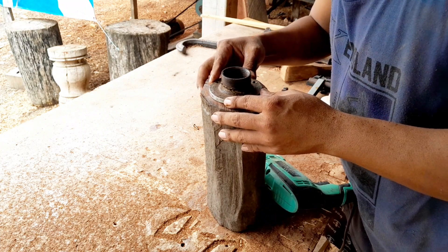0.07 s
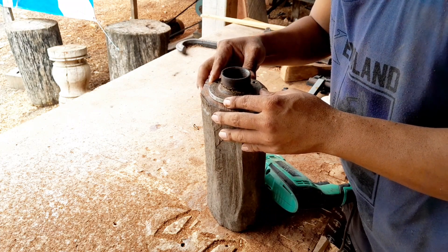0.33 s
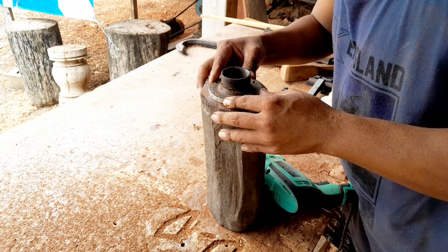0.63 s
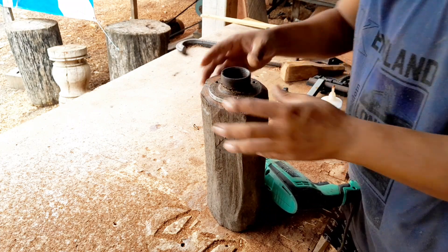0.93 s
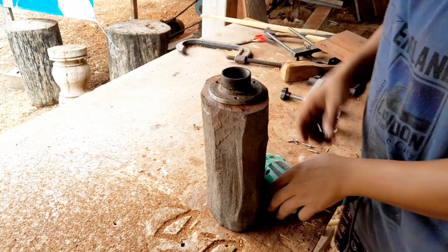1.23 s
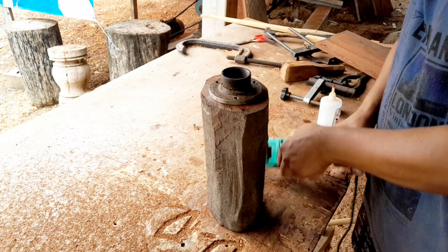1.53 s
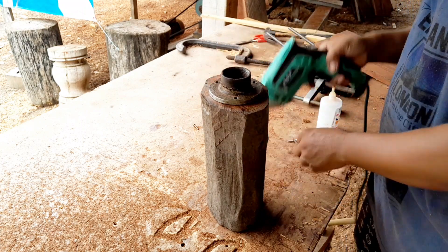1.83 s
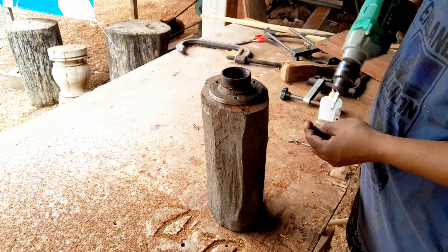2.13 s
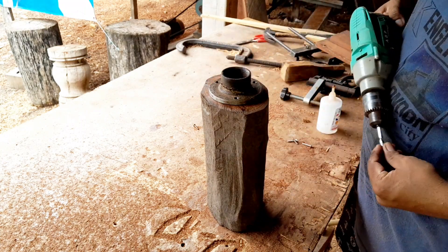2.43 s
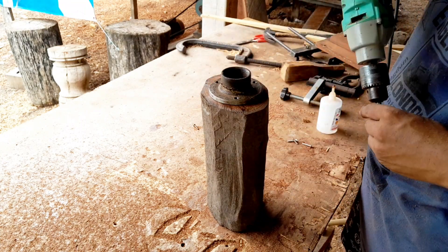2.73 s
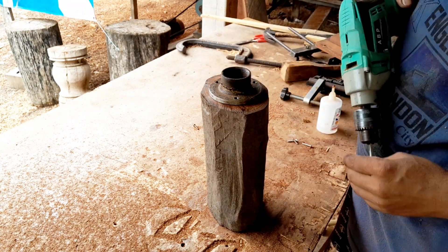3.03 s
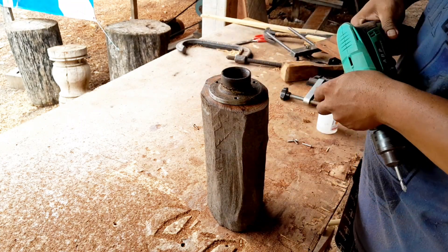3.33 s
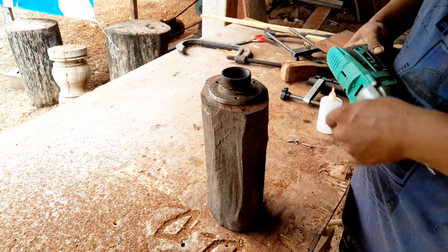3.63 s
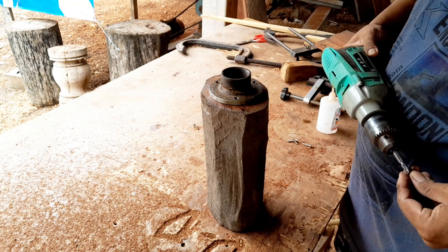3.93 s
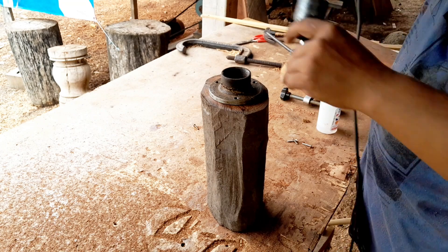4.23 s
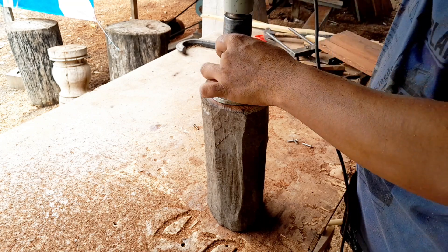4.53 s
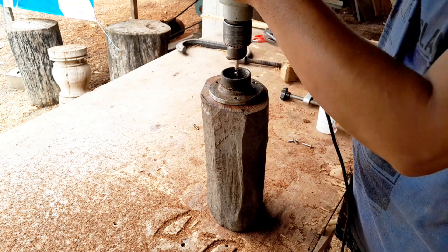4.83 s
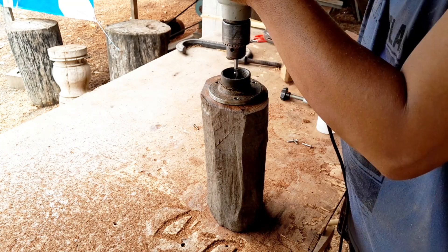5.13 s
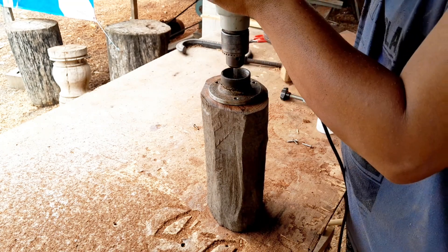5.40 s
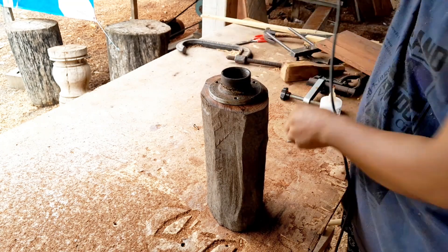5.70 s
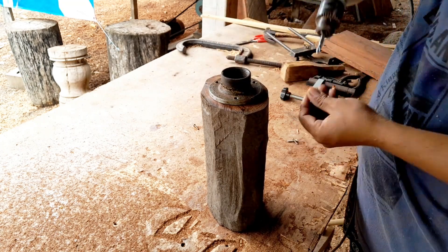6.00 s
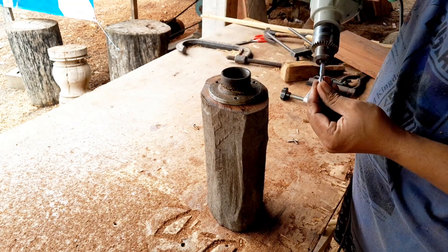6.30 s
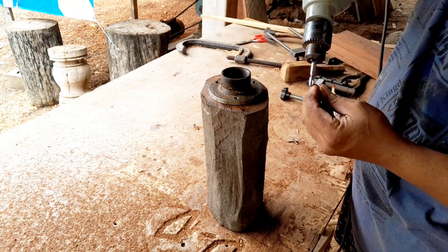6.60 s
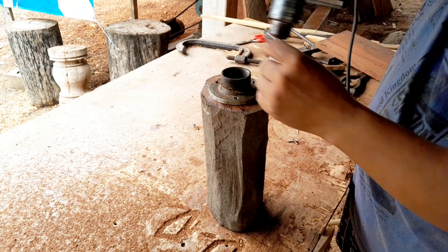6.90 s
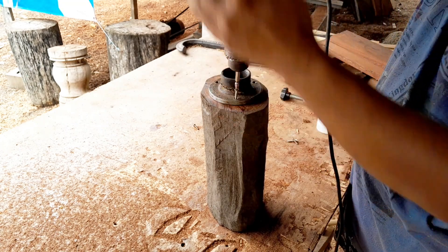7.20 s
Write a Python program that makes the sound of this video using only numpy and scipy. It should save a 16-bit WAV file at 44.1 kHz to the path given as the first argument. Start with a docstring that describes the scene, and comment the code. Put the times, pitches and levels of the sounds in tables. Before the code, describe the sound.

A power drill is lifted off a wooden bench, clicks as its bit is seated, and gives three brief whirs while faraway birds chirp.

```python
"""A low rumble and a far machine's hum fill a yard; small birds whistle and chirp in the distance.
Close to the stereo microphone, hands lift a corded drill off a wooden workbench and seat its bit:
skin and cloth rub, metal and plastic click, the bench knocks and the shell squeaks.
Three blips of the trigger set gears rattling and whining and brushes fizzing. The motor coasts
down freely the first time; twice the bit brakes it in a wooden workpiece."""
import sys
import numpy as np
from scipy import signal
from scipy.fft import rfft, irfft
from scipy.io import wavfile

SR = 44100
rng = np.random.default_rng(int(sys.argv[2]) if len(sys.argv) > 2 else 0)


def master(y):
    """Save y as 16-bit WAV."""
    cut = np.clip(np.atleast_2d(y).T, -1, 1)
    pcm = np.round(cut * 32767)  # scale
    wavfile.write(sys.argv[1], SR, pcm.astype(np.int16))


N = 319857
TIME = np.arange(N) / SR
TOP_HZ, EDGE_HZ = 248, 15600  # the rotor's top speed; the recorder's band limit


def amp(db):
    """Decibels to gain."""
    return 10 ** (np.asarray(db) / 20)


def unit(x):
    """Scales to rms 1."""
    return x / np.sqrt(np.mean(x ** 2) + 1e-20)


def read(points, hz):
    """Reads a curve on a log-frequency axis."""
    f, value = np.transpose(points)
    return np.interp(np.log(hz + 1), np.log(abs(f) + 1), value)


def add(mix, s, sound):
    """Mixes a sound in at time s."""
    part = mix[:, max(round(s * SR), 0):][:, :sound.shape[-1]]
    part += sound[..., :part.shape[1]]


def pan(side_db):
    """Left and right gains for a level difference, left minus right."""
    return amp(np.array([[.5], [-.5]]) * side_db)


def colour(x, points, size=8192):
    """Causal filter of unit power, shaped by (frequency [Hz], level [dB]) points."""
    gain = amp(np.maximum(read(points, abs(np.fft.fftfreq(size, 1 / SR))), -100))
    minimum_phase = np.exp(np.conj(signal.hilbert(np.log(unit(gain)))))
    taps = np.fft.ifft(minimum_phase).real[:size // 2]
    return signal.fftconvolve(x, taps[None], axes=1)[:, :x.shape[1]]


def mic_pair(x, sides):
    """Makes two noises alike in the bass; sides lists (frequency [Hz], left minus right [dB])."""
    # likeness of the two channels: (frequency [Hz], correlation [0-1])
    likeness = [(30, 1), (130, 0.81), (300, 0.36), (700, 0.4), (1500, 0), (4000, 0.045), (15000, 0)]
    z, hz = rfft(x), np.fft.rfftfreq(x.shape[1], 1 / SR)
    same = np.clip(read(likeness, hz), -1, 1)
    right = same * z[0] + np.sqrt(1 - same ** 2) * z[1]
    return irfft(np.array([z[0], right]) * pan(read(sides, hz)), x.shape[1])


def bands(x):
    """Splits into low, middle and high."""
    filters = [(1300, "low"), ((1300, 6000), "band"), (6000, "high")]
    return [signal.sosfilt(signal.butter(3, hz, kind, fs=SR, output="sos"), x) for hz, kind in filters]


def wander(count, rate):
    """Random drift through `rate` new values a second."""
    knots = rng.standard_normal(8192)
    return np.interp(np.arange(count) * rate / SR, np.arange(len(knots)), knots)


def grit(count, spread_db, rate):
    """Noise that comes in clumps."""
    return unit(rng.standard_normal((2, count)) * amp(spread_db * wander(count, rate)))


def glides(rows, rasp):
    """Short sliding tones whose pitch trembles, more so in wide sweeps."""
    out = np.zeros((2, N))
    for s, first_hz, last_hz, length, db in rows:
        count = int(length * SR)
        depth = rasp * (.45 + abs(np.log2(first_hz / last_hz)))
        tremble = depth * (wander(count, 2600) + .6 * wander(count, 90))
        hz = np.geomspace(first_hz, last_hz, count) * (1 + tremble)
        swell = signal.windows.tukey(count, .5) * amp(4 * wander(count, 120))
        add(out, s, amp(db) * swell * np.sin(2 * np.pi * np.cumsum(hz) / SR))
    return out


def background():
    """All around the microphone: lumpy deep rumble and a low drone under faint outdoor hiss."""
    # the yard's ambience: (time [s], rumble [dB], drone [dB], hiss [dB])
    levels = [(0, -51.5, -54.5, -67), (.35, -48.5, -52, -75.5), (.7, -51, -62.5, -72),
              (1.3, -48.5, -49.5, -73.5), (1.92, -51.5, -53, -62.5), (2.17, -68.5, -58.5, -73),
              (3.05, -63.5, -55, -71), (3.601, -60.5, -56.5, -66), (4.08, -64.5, -62.5, -73.5),
              (4.75, -53.5, -54, -69.5), (5.5, -57, -57.5, -66.5), (5.95, -59, -57.5, -71.5),
              (6.6, -62.5, -60.5, -69.5), (7.02, -77, -66, -73), (7.25, -59.5, -60, -67)]
    # spectra of the three layers: (frequency [Hz], density [dB])
    rumble_colour = [(15, -42), (30, -22), (55, -7), (85, 1.5), (105, -7.5), (150, -13), (250, -31.5),
                     (500, -40), (1000, -72)]
    drone_colour = [(40, -40), (95, -13), (120, 2), (140, 2), (165, -5.5), (210, -19), (270, -23),
                    (500, -35), (1000, -66)]
    hiss_colour = [(120, -29), (200, 0), (249, -22), (321, -9.5), (407, -17.5), (702, -21.5), (1560, -30.5),
                   (3890, -29.5), (5110, -36.5), (5910, -34.5), (7350, -28), (8980, -34), (14700, -34),
                   (15500, -42)]
    rumble = mic_pair(grit(N, spread_db=-2, rate=21), [(40, 3.2), (150, 4.3)])
    drone = mic_pair(grit(N, spread_db=.5, rate=14), [(100, 2.3), (300, 1)])
    hiss = mic_pair(rng.standard_normal((2, N)), [(200, 1), (15000, .014)])
    layers = colour(rumble, rumble_colour), colour(drone, drone_colour), colour(hiss, hiss_colour)
    s, *columns = np.transpose(levels)
    return sum(unit(layer) * amp(np.interp(TIME, s, db)) for layer, db in zip(layers, columns))


def machine_hum(hz=327, rise_db_per_s=150, fade_db_per_s=146.5):
    """Far off to the left a machine runs in short spells; its tone wavers, swells and fades."""
    # the machine's tone: (harmonic [number], level [dB])
    partials = [(1, 6), (2, -19), (3, -32)]
    # its spells of running: (start [s], length [s], level [dB])
    runs = [(0, .82, -71), (2.683, 0.026, -64.5), (3.708, 0.018, -65), (4.837, 0.038, -74),
            (5.778, 0.033, -61.5), (6.05, .78, -62.5)]
    angle = 2 * np.pi * np.cumsum(hz * (1 + .0011 * wander(N, 17))) / SR
    tone = unit(sum(amp(db) * np.sin(k * angle) for k, db in partials))
    level = 0
    for s, length, db in runs:
        before, after = np.maximum(s - TIME, 0), np.maximum(TIME - s - length, 0)
        level += amp(db - rise_db_per_s * before - fade_db_per_s * after)
    return tone * level * amp(-1) * pan(7.7)


def rubs(range_db=20):
    """Close, gritty friction of shell, hands and cloth; a stroke moves range_db per rise or fade."""
    # strokes: (crest [s], rise [s], fade [s], low [dB], middle [dB], high [dB])
    strokes = [(.35, 0.24, 0.46, -74, -80, -81), (.75, 0.73, 0.16, -71, -98, -95),
               (1.2, 0.066, 0.26, -89, -102, -85), (1.318, 0.0099, 0.082, -60, -57, -58.5),
               (1.43, 0.28, 0.26, -61, -72, -69.5), (1.486, 0.026, 0.18, -43, -50.5, -59),
               (1.613, 0.062, .13, -60, -50, -53), (1.78, 0.058, 0.087, -51.5, -62, -65),
               (1.84, 0.9, .35, -72, -67, -78), (2.57, 0.11, 0.17, -90, -75.5, -75.5),
               (2.675, 0.02, 0.019, -61, -50, -55.5), (2.77, 0.21, 0.075, -76, -72, -74),
               (2.995, 0.019, .03, -70, -50, -53), (3.08, 0.45, 0.064, -69, -68.5, -71.5),
               (3.127, 0.014, 0.013, -67, -68, -60), (3.265, 0.058, 0.34, -68.5, -66, -73),
               (3.657, .045, 0.046, -54, -43.5, -55), (4.26, 0.11, 0.062, -68.5, -72.5, -70),
               (4.352, 0.019, 0.038, -50.5, -60, -67), (4.656, 0.013, 0.093, -65, -78, -87),
               (4.96, 0.27, 0.21, -67.5, -75, -73), (5.106, 0.018, 0.025, -58, -58, -62),
               (5.191, 0.036, 0.027, -61, -60, -70), (5.68, 0.13, .2, -59, -66.5, -79),
               (5.79, 0.032, 0.14, -55.5, -66, -70), (5.86, .1, 0.35, -67.5, -66.5, -69),
               (6.316, 0.016, 0.042, -65.5, -61.5, -58.5), (6.938, 0.065, 0.18, -62.5, -64.5, -71)]
    # friction spectrum: (frequency [Hz], level [dB])
    rub_colour = [(150, -18.5), (330, 0), (550, -7.5), (1200, -11.5), (2800, -10), (5500, -17.5),
                  (7500, -16.5), (9500, -21), (15000, -21.5)]
    friction = mic_pair(grit(N, spread_db=2.5, rate=250), [(300, 1), (15000, -1)])
    layers = bands(colour(friction, rub_colour))
    t, power = TIME[::32], 0
    for s, rise, fade, *band_db in strokes:
        away = np.maximum((s - t) / rise, (t - s) / fade)
        power += amp(np.array(band_db)[:, None] - range_db * away) ** 2
    return sum(unit(layer) * np.interp(TIME, t, np.sqrt(p)) for layer, p in zip(layers, power))


def yard_echo(x, stretch, count=24000):
    """Scattered echoes from the shed, the logs and the trees."""
    # the yard's decay: (frequency [Hz], t60 before stretching [s])
    decay = [(100, .25), (1000, .3), (4000, .25), (15000, .12)]
    taps = rng.standard_normal((2, count)) * (rng.random((2, count)) < .08)
    taps *= np.arange(count) > SR * .004  # gap before the first echo
    hz, t, z = signal.stft(taps, SR, nperseg=256)
    t60 = stretch * read(decay, hz)[:, None]
    tail = signal.istft(z * amp(-60 * t / t60), SR)[1]
    return signal.fftconvolve(x, tail / np.linalg.norm(tail[0]), axes=1)[:, :N]


def birds(chatter_count=24, chatter_from_s=5.1, chatter_hz=5500, chatter_db=-73):
    """Distant raspy chirps and thin whistles, reaching the microphone mostly as echoes."""
    # falling chirps of the nearer birds: (time [s], top pitch [Hz], level [dB])
    nearer = [(1.04, 4750, -83), (4.136, 5580, -66), (4.323, 5600, -71.5), (4.46, 4980, -65),
              (4.555, 3750, -72.5), (4.69, 6000, -60), (4.84, 5750, -60), (4.977, 5970, -64),
              (5.734, 5260, -70.5), (5.818, 5400, -65), (5.92, 6540, -67.5), (6.01, 4710, -68.5),
              (6.085, 5300, -67), (6.16, 6400, -70), (6.418, 5120, -69), (6.5, 5200, -69),
              (6.59, 6350, -65.5), (6.638, 5390, -64.5), (6.708, 5540, -65.5), (6.803, 5080, -74.5),
              (7.083, 5520, -67.5), (7.153, 5650, -65.5), (7.21, 6700, -69.5)]
    # another bird's rising whistles: (time [s], pitch [Hz], level [dB])
    whistles = [(.28, 3410, -87), (.49, 2550, -84), (0.674, 2630, -87.5), (.81, 2747, -81.5),
                (.98, 2860, -87), (1.138, 3020, -80), (4.035, 1913, -79), (5.461, 2900, -67.5)]
    chirp_s, chirp_fall, spread_octaves = .042, .56, .11
    whistle_s, whistle_rise = .066, 1.05
    chirps = list(nearer)
    for k, (when, pitch) in enumerate(rng.random((chatter_count, 2))):  # more join in, farther off
        s = chatter_from_s + (k + when) / chatter_count * (N / SR - chatter_from_s)
        chirps.append((s, chatter_hz * 2 ** (.5 * (pitch - .5)), chatter_db))
    variation = 2 ** (spread_octaves * rng.uniform(-1, 1, (len(chirps), 2)))
    notes = [(s, hz, hz * chirp_fall * fall, chirp_s * stretch ** 2, db)
             for (s, hz, db), (fall, stretch) in zip(chirps, variation)]
    notes += [(s, hz, hz * whistle_rise, whistle_s, db) for s, hz, db in whistles]
    calls = glides(notes, rasp=.08)
    return amp(3.15) * (.55 * calls + yard_echo(calls, stretch=.85)) * pan(1)


def resonate(x, ring_db):
    """Adds a broad low wooden resonance and the narrow rings of the metal case and chuck."""
    # the wood first, then the metal: (frequency [Hz], width [Hz], level [dB])
    resonances = [(430, 130, -5), (867, 18, 1), (1051, 16, 0), (1475, 25, 2), (1750, 30, -1), (2517, 20, 2),
                  (2655, 50, 1), (2895, 30, 2), (3566, 22, 0), (4420, 30, 1)]
    return x + sum(amp(db + ring_db) * signal.lfilter(*signal.iirpeak(hz, hz / width, SR), x)
                   for hz, width, db in resonances)


def clicks(count=8000, lead_s=.02, lead_in_s=.004, snap_s=.001, rattle_t60_s=.052):
    """Close, sharp clicks of chuck, bit and shell: a brief soft swell, a snap, then a rattle."""
    # contacts: (time [s], level [dB], body [dB], treble [dB], left minus right [dB])
    contacts = [(1.313, -41, -7, -9, 1), (1.475, -26, 25, -34, 2), (1.481, -20.5, 1, -33, 4),
                (1.486, -27.5, -3.5, -37, -7), (1.528, -32, -1, -33, 7), (1.771, -48, -9, -30, 8),
                (1.868, -44, -6, -28, 2), (1.918, -45, -26, 2, -9), (1.936, -39.5, -18, -2.5, -6),
                (1.955, -42, -20, 4, 1), (2.005, -44, -5, -13, 2), (2.032, -49, -13, -15, 3),
                (2.419, -54, -5.5, -5, -1.5), (2.675, -33.5, -15, -6.5, 0), (2.826, -50.5, -7, -9, 0.5),
                (2.989, -38, -29, 3, -8), (3.001, -22, -12.5, -1.5, 2.5), (3.054, -42.5, -3.5, -26, 4),
                (3.126, -43.5, -4, -7, 2), (3.192, -53.5, -14, -5, -5), (3.324, -38, -11.5, -10.5, -1),
                (3.578, -25.5, -8, -6.5, 1.5), (3.657, -27, 14, -27, 1), (3.92, -49.5, -6, 2, 3),
                (4.053, -52, -31.5, -7.5, 0.5), (4.127, -55, -34, 1, 1), (4.352, -36, -6.5, -24, 1),
                (4.447, -49.5, 3, -10, -1), (4.919, -44, -19, -9.5, 2), (5.11, -35, -13, -15.5, 1),
                (5.161, -44.5, -16, -17, 5), (5.193, -43, -22, -7, -5), (5.335, -6.5, -12.5, -29, 4.5),
                (5.458, -39.5, -23, -9.5, 3), (5.647, -41, -8, -15, 4), (6.305, -46.5, -33, -1, -3),
                (6.359, -47.5, -24, -1.5, -1), (6.464, -40.5, -34, -8, 0), (6.505, -44.5, -14.5, -17, 6),
                (6.565, -43, -1, -13, -1)]
    # contact spectrum: (frequency [Hz], level [dB])
    click_colour = [(150, -7), (500, 6), (1200, 3), (2700, 11), (4500, 3.5), (7500, -9.5), (9500, -16.5),
                    (13000, -13.5), (16000, -23)]
    out, t = np.zeros((2, N)), np.arange(count) / SR - lead_s
    lead_in = amp(-14) * np.exp(-abs(t) / lead_in_s)
    snap = np.exp(-abs(t) / snap_s)
    rattle = amp(-11 - 60 * abs(t) / rattle_t60_s)
    envelope = np.where(t < 0, lead_in, snap + rattle)
    envelope_rms = np.sqrt(np.mean(envelope ** 2))
    for s, db, body_db, treble_db, side_db in contacts:
        burst = mic_pair(rng.standard_normal((2, count)), [(100, .021), (15000, .0051)]) * envelope
        low, middle, high = map(unit, bands(colour(resonate(burst, ring_db=-12.5), click_colour)))
        click = unit(amp(body_db) * low + amp(-8) * middle + amp(treble_db) * high)
        add(out, s - lead_s, click * envelope_rms * amp(db - 6) * pan(side_db))
    return out


def bench_shoves():
    """The bench rumbles dully as weight shifts on it."""
    # shifts of weight: (time [s], half length [s], level [dB])
    shoves = [(1.39, 0.033, -43), (1.516, 0.06, -35), (1.82, 0.1, -52.5), (3.057, 0.024, -47),
              (3.793, 0.026, -51.5), (4.541, 0.049, -48.5), (4.667, 0.08, -46), (4.968, 0.054, -50),
              (5.2, 0.043, -50.5), (5.764, 0.075, -43), (6.3, .04, -61)]
    # the bench's rumble: (frequency [Hz], density [dB])
    shove_colour = [(25, -44), (45, -15.5), (65, -4), (100, 0), (140, -5.5), (200, -11), (300, -19),
                    (800, -59.5)]
    noise = mic_pair(rng.standard_normal((2, N)), [(50, 4), (200, 3.2)])
    swells = sum(amp(db) * np.exp(-((TIME - s) / half_s) ** 2) for s, half_s, db in shoves)
    return unit(colour(noise, shove_colour)) * swells


def bench_knocks(count=20000):
    """The bench top rings as the drill rocks on it or the bit jolts the workpiece."""
    # blows: (time [s], level [dB])
    blows = [(1.479, -42.5), (1.486, -28), (1.506, -28.5), (1.526, -34), (1.547, -43), (1.771, -38.5),
             (1.797, -41), (4.347, -47.5), (5.337, -57)]
    # modes of the wooden top: (frequency [Hz], level [dB], t60 [s])
    modes = [(62, -12, 0.22), (104.6, -6.5, 0.11), (148.7, -2, 0.28), (218, -3, 0.11), (240, -9.5, 0.074),
             (302, -11, 0.091), (499, -7.5, 0.074)]
    out, t = np.zeros((2, N)), np.arange(count) / SR
    ring = sum(amp(db - 60 * t / t60) * np.sin(2 * np.pi * hz * t) for hz, db, t60 in modes)
    for s, db in blows:
        add(out, s, amp(db) * ring * pan(.65))
    return out


def squeaks():
    """Close on the left, the plastic shell sticks and slips as the drill is picked up."""
    # slips: (time [s], first pitch [Hz], last pitch [Hz], length [s], level [dB])
    slips = [(1.59, 1646, 2420, 0.042, -43), (1.912, 3270, 2930, 0.0196, -49.5),
             (1.933, 2890, 2560, 0.015, -50.5), (1.953, 2810, 2480, 0.009, -51)]
    return amp(-4) * resonate(glides(slips, rasp=.198), ring_db=-5) * pan(11.5)


def handling_bumps(count=20000):
    """Soft bumps of the hands give only a few low cycles."""
    # bumps: (time [s], level [dB], pitch [Hz], half length [s])
    bumps = [(3.047, -31.5, 108, 0.0063), (4.516, -45.5, 125, 0.021), (4.594, -37.5, 105, 0.0052),
             (4.659, -26, 113, 0.0045), (5.214, -38.5, 121, 0.023), (5.348, -31.5, 146, 0.013),
             (5.73, -47, 99, 0.0047), (5.795, -58, 107, 0.0081), (5.953, -40, 100, 0.01),
             (6.269, -37.5, 109, 0.0076)]
    out, t = np.zeros((2, N)), np.arange(count) / SR
    t -= t.mean()
    for s, db, hz, half_s in bumps:
        bump = np.exp(-(t / half_s) ** 2) * np.sin(2 * np.pi * hz * t)
        add(out, s + t[0], amp(db) * bump * pan(4))
    return out


def rotor(t, held, spinup, friction, drag_per_s=1.4):
    """Turns per second: rising while the trigger is held, then slowed by friction and fan drag."""
    driven = TOP_HZ * (1 - np.exp(-np.minimum(t, held) / spinup))
    offset = friction / drag_per_s
    return np.maximum((driven + offset) * np.exp(-drag_per_s * np.maximum(t - held, 0)) - offset, 0)


def gear_rattle(angle, body):
    """Gear noise throbs once a turn, ringing wood and metal, coloured by the drill's body."""
    # the drill's place in the stereo image: (frequency [Hz], left minus right [dB])
    sides = [(60, 2.5), (110, -2), (200, -5.5), (380, 11.5), (700, -2), (1290, 4.5), (2380, 0.5), (4400, 2),
             (8120, -8), (15000, -0.5)]
    rattle = grit(len(angle), spread_db=-.5, rate=1500) * (1 + .3 * np.cos(angle))
    return unit(colour(resonate(mic_pair(rattle, sides), ring_db=-5.5), body))


def gear_whine(angle, speed):
    """Gear teeth and commutator sing at multiples of the rotor speed."""
    # whine partials: (multiple [per turn], level [dB])
    partials = [(24, -1.5), (28, -7), (30, -6), (36, -2), (42, -5), (48, 1), (60, -4), (72, -3), (84, -3),
                (96, -2), (120, -3)]
    # how the shell radiates them: (frequency [Hz], level [dB])
    shell = [(500, -20), (2000, -2), (3200, 1), (4500, 1), (5600, -8), (8000, -7), (9500, -16),
             (15000, -16)]
    teeth = 0
    for k, db in partials:
        level = amp(db + 4 * wander(len(angle), 110)) * (k * speed < EDGE_HZ)
        teeth += level * np.cos(k * angle + 2 * np.pi * rng.random((2, 1)))
    return unit(colour(teeth, shell))


def brush_whir(speed):
    """At low speed the brushes chatter over the commutator bars."""
    # chatter spectrum: (frequency [Hz], level [dB])
    whir_colour = [(800, -20), (2600, -4), (4200, 0), (5000, -8.5), (6000, -26), (15000, -27)]
    chatter = unit(colour(grit(len(speed), spread_db=.5, rate=1800), whir_colour))
    return chatter * amp(5) * np.interp(speed, [3, 25, 60, 120], [0, 3.2, 1.6, 0])


def armature_growl(angle, current, ring_hz=2520, width_hz=520):
    """Under current, twelve armature slots sweep round and ring the motor housing."""
    slots = np.cos(12 * angle + .8 * wander(len(angle), 750) + 2 * np.pi * rng.random((2, 1)))
    force = current * slots * (1 + .55 * wander(len(angle), 700))
    return signal.lfilter(*signal.iirpeak(ring_hz, ring_hz / width_hz, fs=SR), force) * pan(9.6)


def blip(body, held, spinup, friction, level_db, whine_db, growl_db, fizz_db, count=26000):
    """One pull of the trigger: the motor's noises swell and die with the rotor speed."""
    current_fade_s, judder_hz, kick_db, spark_db, loudness_power = .0092, 4, 10.5, 3, 2.19
    t = np.arange(count) / SR
    speed = rotor(t, held, spinup, friction)
    pace = speed / TOP_HZ
    current = np.exp(-np.maximum(t - held, 0) / current_fade_s)
    backlash = judder_hz * (1 + current) * wander(count, 700)  # strongest under torque
    angle = 2 * np.pi * np.cumsum(speed + backlash) / SR
    gears = gear_rattle(angle, body)
    treble = signal.sosfiltfilt(signal.butter(2, 4500, "high", fs=SR, output="sos"), gears)
    rattle = (gears - treble) * amp(kick_db * current * (1 - pace))  # starting torque slams the gears
    fizz = treble * amp(fizz_db + spark_db * current)  # the brushes spark while current flows
    whine = gear_whine(angle, speed) * (1 - current) ** 2  # the teeth sing when they run free
    whir = brush_whir(speed) * (t > held)
    coasting = amp(whine_db) * (whine + whir) * np.interp(speed, [60, 230], [1.4, .85])
    growl = amp(growl_db) * armature_growl(angle, current)
    unbalance = amp(-15) * pace ** 2 * np.sin(angle)
    return (rattle + fizz + coasting + growl + unbalance) * amp(level_db) * pace ** loudness_power


def drill():
    """Close to the microphone: one free spin in the hands, two with the bit braced in the wood."""
    # trigger pulls: (start [s], held [s], spin-up [s], friction [Hz/s],
    # level [dB], whine [dB], growl [dB], brush fizz [dB])
    pulls = [(3.31, .058, .021, 301.5, -29.5, -8, 8.5, -6), (5.26, .075, .017, 2600, -32, -38, 4.5, 4.5),
             (5.525, 0.036, .008, 3000, -33.5, -18.5, 2.5, -2.5)]
    # colour of the drill's body, free and braced: (frequency [Hz], density [dB])
    free = [(71, -38.5), (120, -36.5), (225, -14.5), (265, -27.5), (312, -15.5), (478, -11.5), (690, -0.5),
            (1720, -9.5), (2440, -10.5), (2590, -15.5), (3170, -9), (7610, -11.5), (9320, -20.5),
            (12400, -13), (15500, -23.5)]
    braced = [(53, -50), (90, -13), (151, -2.5), (288, -13), (846, -4.5), (942, -7.5), (1510, -7),
              (1880, -9), (2590, -4.5), (4440, -10.5), (5630, -19.5), (7780, -22.5), (9050, -30.5),
              (13600, -23), (15500, -29.5)]
    out = np.zeros((2, N))
    for (s, *settings), body in zip(pulls, (free, braced, braced)):
        add(out, s, blip(body, *settings))
    return out


def scene():
    """The work at the bench, close and nearly dry, with the yard behind it."""
    near = drill() + clicks() + bench_knocks() + handling_bumps() + rubs() + squeaks()
    reflections = amp(-15) * yard_echo(near, stretch=.057)
    return near + reflections + bench_shoves() + birds() + machine_hum() + background()


def record(dry, low_cut_hz=30):
    """The microphone's low cut and the recorder's band limit."""
    dry = signal.sosfilt(signal.butter(2, low_cut_hz, "high", fs=SR, output="sos"), dry)
    band_limit = signal.firwin(511, EDGE_HZ, window=("kaiser", 9), fs=SR)
    return signal.oaconvolve(dry, band_limit[None], "same")


dry = scene()
out = record(dry)
master(out)
```